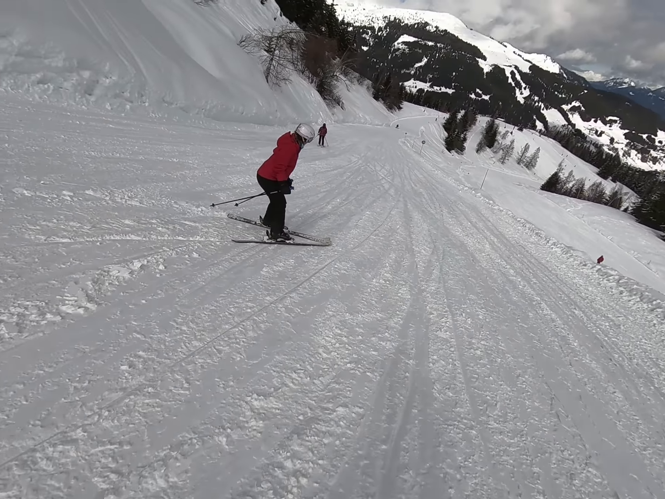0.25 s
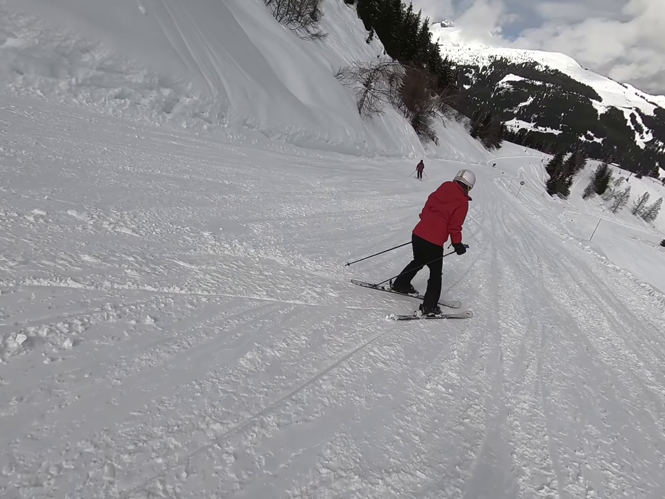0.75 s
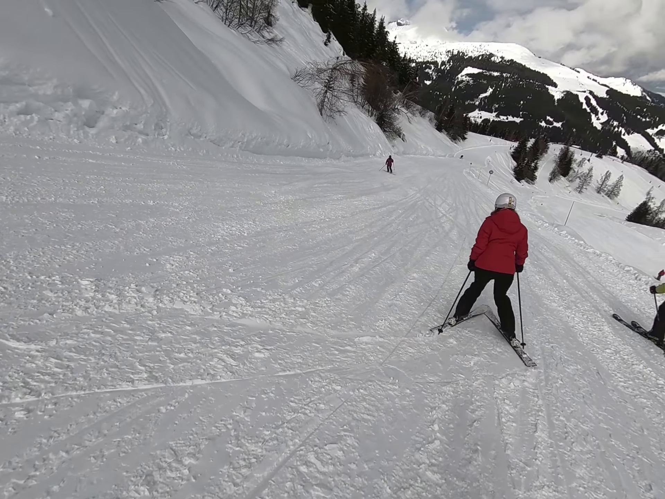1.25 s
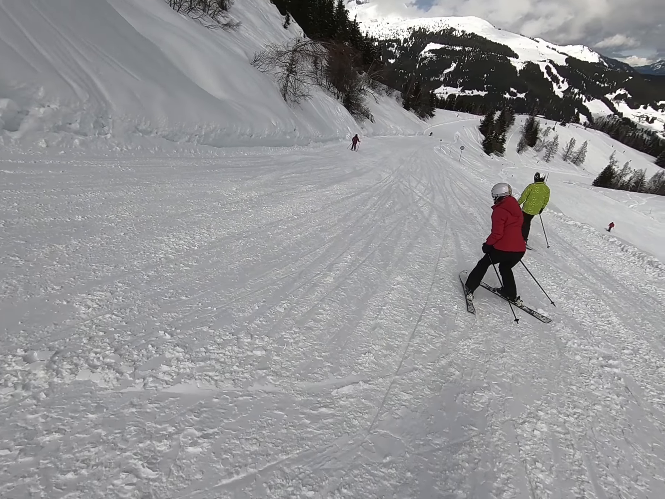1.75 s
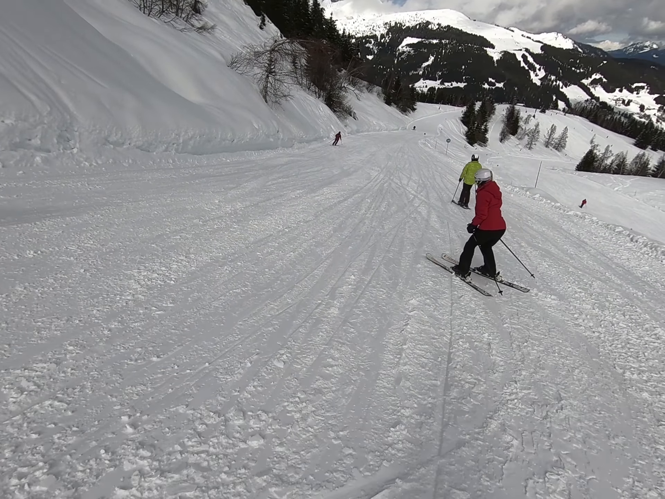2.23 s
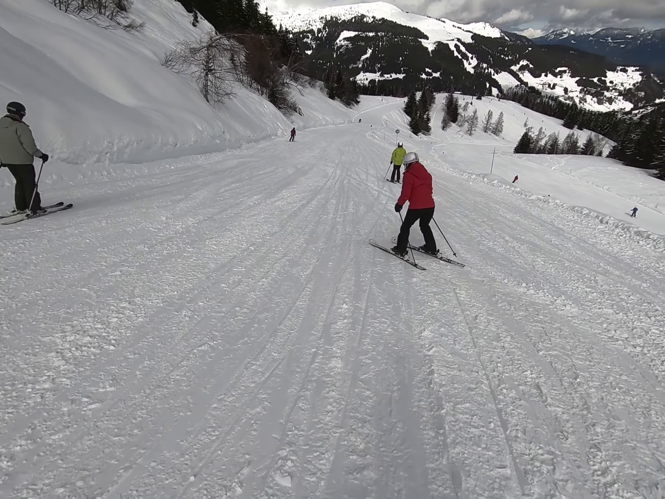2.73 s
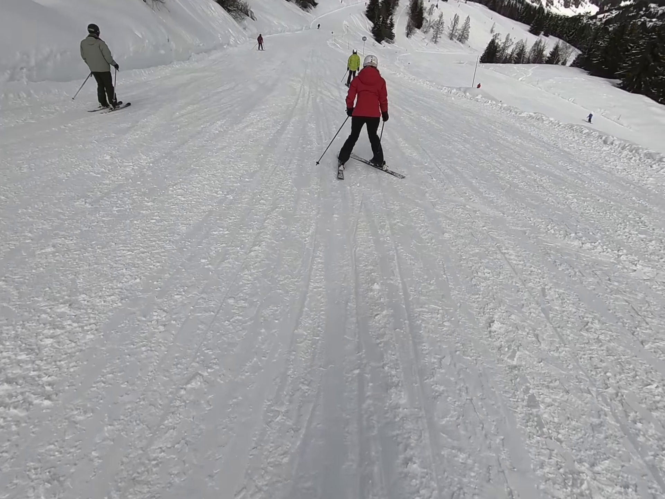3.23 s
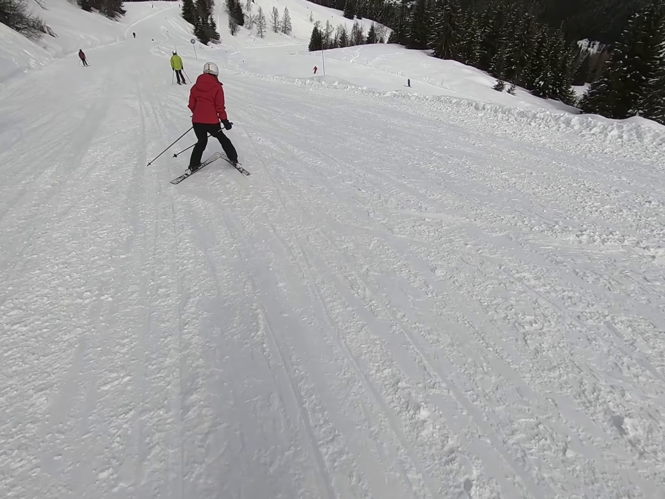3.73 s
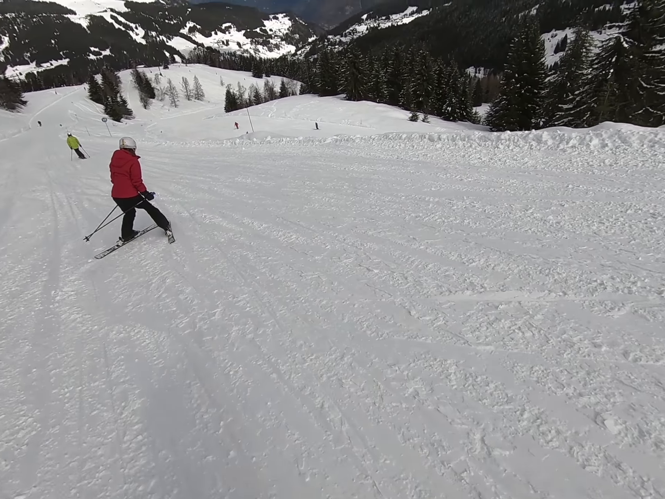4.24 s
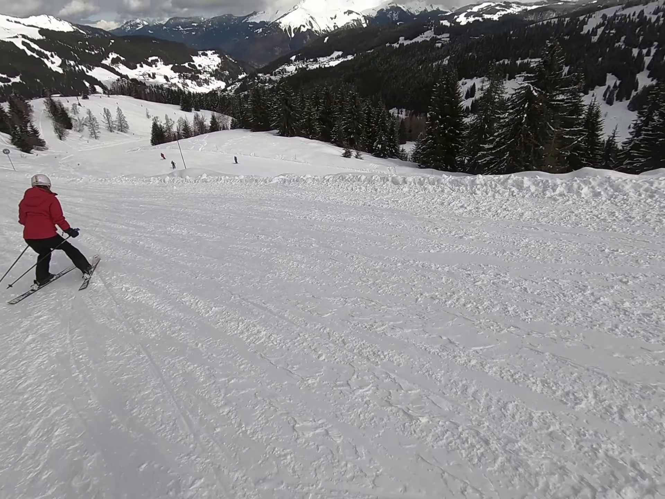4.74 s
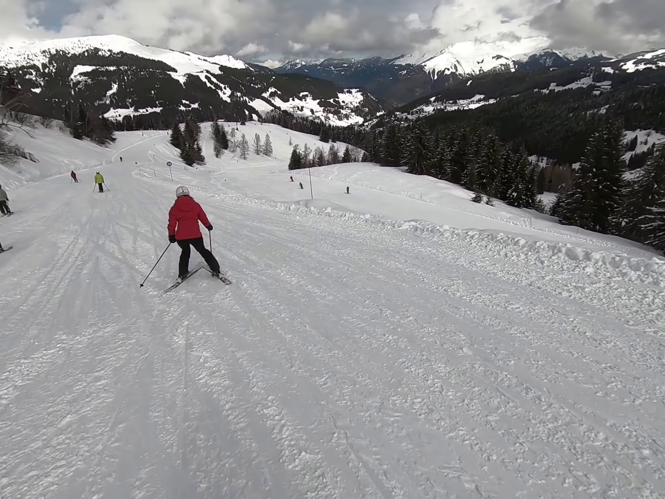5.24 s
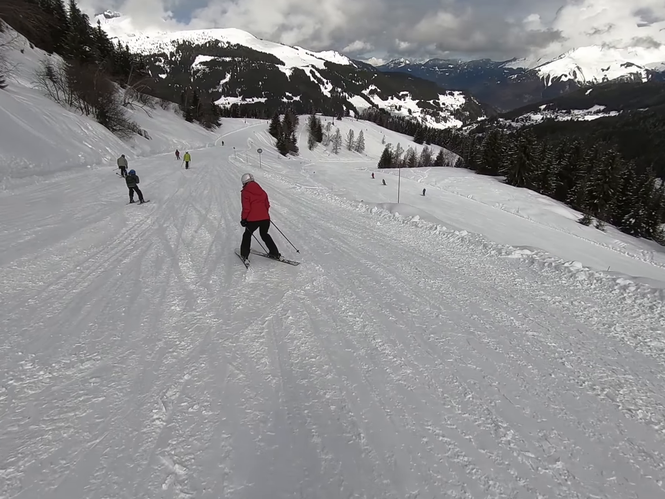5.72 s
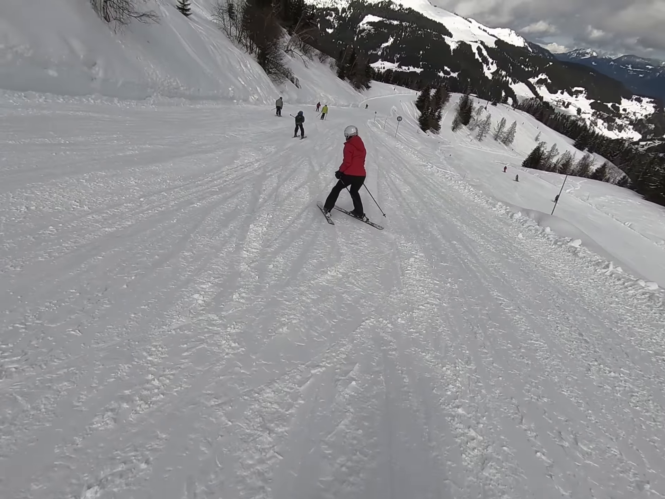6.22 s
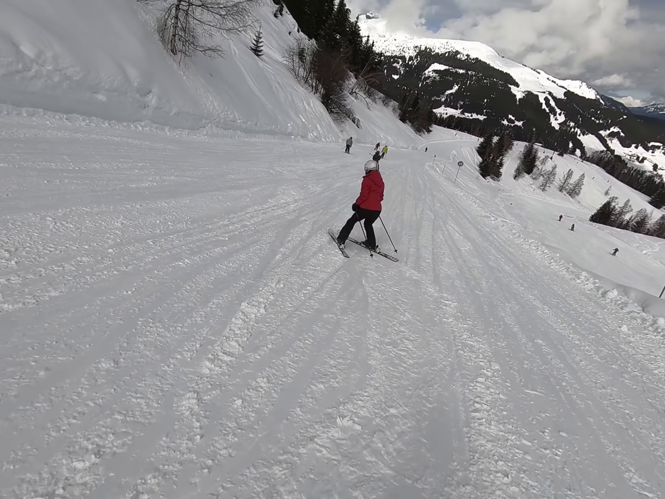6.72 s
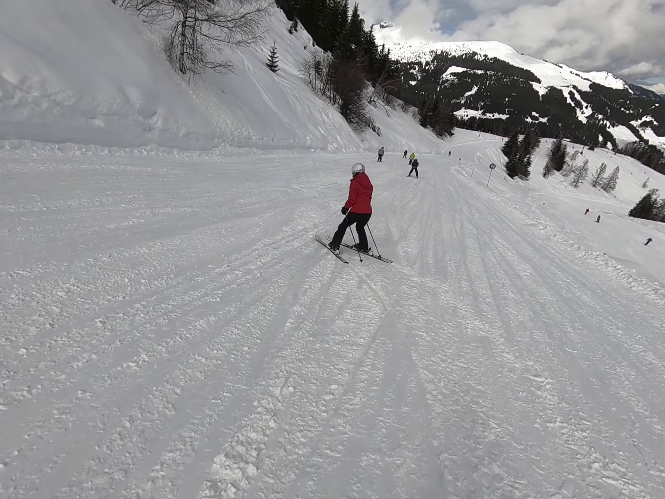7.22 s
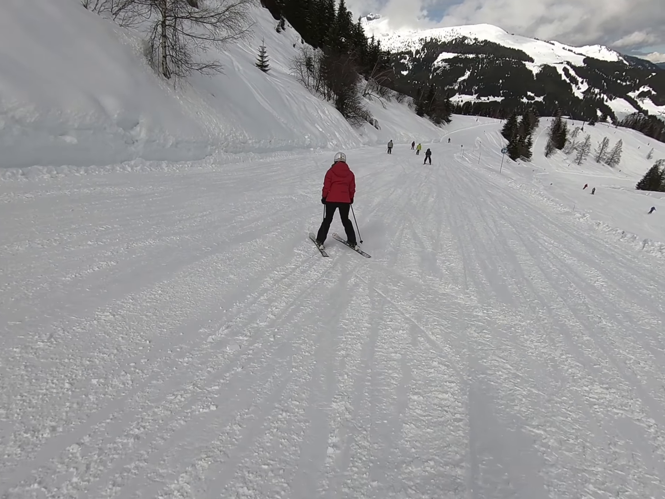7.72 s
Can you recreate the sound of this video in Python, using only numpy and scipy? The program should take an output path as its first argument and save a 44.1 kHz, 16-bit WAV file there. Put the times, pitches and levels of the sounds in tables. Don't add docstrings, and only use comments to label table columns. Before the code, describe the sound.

From 0 to about 1.9 seconds, skis hiss and scrape over chopped snow in a close, centred mono sound with little wind; the crunch is strongest at the start and eases, with a small knock near 0.9 and more thuds and clicks around 1.9 to 2.1. Between 2 and 2.9 the sound opens into wide stereo and wind hits the microphone: a deep, loud booming rumble, heavier on the right, breaking into bursts and brief lulls, with lumpy buffeting on each side. Several lumps thud and click from 2.9 to 3.7 as a spray of snow swells on the left around 3.5. Scraping grows harsher near 4.6, with hard grains ringing on the skis, thins about 5.4, then bites hard again around 6.4. Strong gusts return near 5.6, with short low flutters at 5.8 and 5.9. Icy rattle, hiss and rumble continue until the abrupt end at 8.

```python
import sys
import numpy as np
from scipy import signal
from scipy.io import wavfile
from scipy.ndimage import uniform_filter1d

SR = 44100
rng = np.random.default_rng(int(sys.argv[2]) if len(sys.argv) > 2 else 0)


def linear_from_db(decibels):
    return 10 ** (np.asarray(decibels, float) / 20)


def wrap_up_sound(samples):
    columns = np.atleast_2d(samples).T
    tamed = np.clip(columns, -1, 1)
    steps = np.round(tamed * 32767).astype(np.int16)
    wavfile.write(sys.argv[1], SR, steps)


N = 351477

# [t/s, share/0-1]
PORT_SHARE = [
    (0, 0),
    (1.87, 0),
    (2.3, 0.69),
    (2.9, 1),
    (8, 1),
]
# [t/s, edge load level/dB, thrown snow level/dB, left-right of edges/dB]
SKI_WORK = [(0, -47.5, -50.5, 0), (0.8, -49.5, -55, -2), (1.5, -50.5, -55.5, 4), (2.11, -54, -59.5, -3),
            (2.7, -51, -59, 3), (3.2, -50.5, -55, 2.5), (3.5, -50, -56, -1), (3.7, -51, -59.5, -8),
            (4.05, -48.5, -57, -8.5), (4.6, -47, -53.5, -8), (4.9, -50.5, -59, -9.5),
            (5.12, -51, -59.5, -9.5), (5.42, -56, -63.5, -4.5), (5.85, -50, -58.5, -11),
            (6.35, -46.5, -54.5, -7), (6.95, -50.5, -58, -6), (7.3, -49.5, -55, -10),
            (7.97, -50.5, -60.5, -6)]
# [lowest f/Hz, highest f/Hz]
SKI_BANDS = [(450, 1000), (1100, 3400), (4300, 6300), (6500, 9500)]
# [f/Hz, level/dB per Hz]
SKI_MONO_COLOUR = [(180, -63), (300, -11), (383, -23), (419, -8), (481, -7.5), (998, -9.5), (1730, -8.5),
                   (2690, -26.5), (3530, -23.5), (4300, -14.5), (5750, -5), (7670, -15), (9070, -18),
                   (11400, -34.5), (14800, -76), (22000, -120)]
SKI_PORT_COLOUR = [(210, -18), (350, -2.5), (497, -2.5), (542, -7), (583, -5), (758, -5), (1300, -4),
                   (1570, -7.5), (1790, -7), (1950, -8), (2580, -9), (4050, -17), (7580, -9),
                   (11400, -30.5), (14800, -74), (22000, -120)]
# [f/Hz, likeness/0-1]
PORT_LIKENESS = [(300, 0.96), (700, 0.37), (1200, 0.43), (2000, 0.59), (3300, 0.22), (4200, 0.07),
                 (5500, 0.12), (9000, 0.14), (12000, 0.19)]
# [f/Hz, phase/radians]
LEFT_LEAD = [(0, -1.5), (860, 1.29), (2500, 0.46), (4220, 1.7), (5250, -2), (6890, -2.5), (9300, -6.5),
             (11500, -5), (15200, -30)]
# [t/s, extra likeness/0-1]
NEAR_SPRAY = [
    (0, 0),
    (2.3, 0),
    (3, 0.45),
    (3.55, 0),
    (3.75, 0),
    (8, 0),
]
# [t/s, half length/s, level/dB, centre f/Hz]
SKIDS = [(1.694, 0.25, 8, 7240), (2.26, 0.0078, 5, 1500), (3.259, 0.011, 5.5, 2980),
         (4.335, 0.0072, 2, 1800), (4.525, 0.045, 5.5, 1100), (4.668, 0.014, 6.5, 1800),
         (4.82, 0.0092, 4, 2200), (5.957, 0.018, 3, 2200), (6.798, 0.0063, 7, 2200),
         (7.88, 0.013, 4.5, 1300), (0.305, 0.03, 4.5, 1300), (2.306, 0.11, 3.5, 497),
         (3.09, 0.046, 3.5, 696), (3.478, 0.058, -8, 800), (5.41, 0.13, -9.5, 600), (6.11, 0.059, 3, 890),
         (5.618, 0.037, 4.5, 3000), (5.98, 0.052, 3, 8000), (7.196, 0.09, 3.5, 1410),
         (7.494, 0.044, 2.5, 1200), (7.76, 0.09, -4.5, 700), (3.978, 0.013, 1, 1500), (2.241, .008, 3, 700),
         (2.4, .02, 5, 700), (3.287, .008, 5, 900), (3.467, 0.012, 2.5, 6000), (3.548, 0.018, 4, 3500),
         (3.7, .025, 3, 1000), (4.45, 0.011, 1, 3000), (4.493, .012, -2, 2970), (4.569, 0.0092, 5, 1500),
         (4.62, 0.021, 0, 1500), (4.69, 0.039, 5.5, 598), (5.425, 0.12, 5.5, 3500), (5.6, 0.07, -0.5, 8000),
         (5.552, .11, -1, 15000), (2.35, 0.28, -1.5, 3780), (7.78, 0.019, -2, 2500),
         (3.437, 0.0092, -3, 1300), (1.0, .11, 3, 400), (6.28, .11, 3, 2800), (5.07, .008, 4, 1300),
         (4.78, .04, 2, 5500), (5.555, .012, 3, 1500), (5.7, 0.018, 0, 1400), (6.203, 0.0099, -1, 4000),
         (6.3, 0.017, 0, 4000), (6.385, 0.068, 0.5, 1400), (6.507, 0.01, 1.5, 3000),
         (7.094, 0.015, 4, 7000), (7.192, 0.018, 1.5, 5000), (7.415, .015, 3.5, 1310),
         (7.79, 0.0052, -3, 1900), (1.805, 0.14, 4, 3020)]
# [f/Hz, level/dB per Hz]
DUST_MONO_COLOUR = [(6590, -41), (11200, -14), (11900, -9), (12300, -2), (14800, -11), (15500, -8)]
# [f/Hz, width/Hz, level/dB]
SKI_RINGS = [
    (950, 90, -7),
    (1310, 60, -1),
    (1780, 60, 1),
]
# [t/s, half length/s, level/dB]
ICY_STRETCHES = [
    (4.2, .15, -6),
    (4.6, .15, -0.5),
    (5.05, .25, 9),
    (6.3, 0.39, -4),
    (7.5, 0.71, 3.5),
]
# [f/Hz, level/dB per Hz]
BUFFET_COLOUR = [(41, -30), (70, 0), (86, -2.5), (129, -10.5), (279, -20.5), (317, -23.5), (347, -26),
                 (600, -41), (780, -29), (1320, -120)]
# [t/s, level/dB, left-right/dB, reach/dB per octave]
EDDIES = [(0, -49, -4, -4), (0.18, -51.5, 0, -2), (0.53, -44, 0, 5), (1.86, -51.5, -7, -2.5),
          (1.95, -46, 0, -5.5), (2.53, -37, -8, 0), (2.75, -28, -0.5, -6.5), (3.26, -27, 0, 0),
          (3.6, -32, -5, -1), (3.9, -34, 3, -0.5), (4.35, -43.5, 2, -2.5), (4.71, -35, -2, -1.5),
          (5.2, -40.5, 3, -3.5), (5.6, -27.5, -13, 0.5), (6.45, -28.5, -8.5, -3), (6.88, -35, -2.5, 0),
          (7.08, -26, 0, -7.5), (7.97, -31, 8, -2)]
# [t/s, half length/s, level/dB, left-right shift/dB]
PUFFS = [(1.92, .025, 6, 0), (2.6, .03, 4, 0), (3.13, 0.018, 1, 2), (3.5, .04, 3, 0), (3.97, .04, 3, 0),
         (4.6, .05, 4, 0), (4.95, .04, 4, 0), (6.6, .05, 4, 0), (7.12, .04, 3, 0), (3.27, 0.042, 4, 7.5),
         (3.79, 0.051, -4.5, 9), (4.19, 0.039, 7.5, 4), (5.41, .04, 5.5, 6.5), (5.49, 0.038, -3, 12),
         (5.83, 0.053, -6, 11), (5.9, 0.023, 10, -1), (5.99, 0.1, -9.5, 11), (6.2, 0.046, 0, -6),
         (6.31, 0.044, -3, 9), (7.23, 0.05, 1.5, -10), (7.3, 0.018, -8, 9), (7.42, 0.036, -8.5, 5),
         (7.65, 0.073, -5.5, 2), (7.79, 0.04, 0.5, -2), (7.86, 0.019, 11.5, -2), (7.93, 0.023, 3, -13)]
# [t/s, level/dB, f/Hz, left-right/dB]
THUDS = [(0.94, -34, 620, 0), (1.659, -36, 466, 0), (1.907, -30, 410, 2), (1.996, -30.5, 343, -1),
         (2.083, -37, 360, -1), (2.875, -26, 465, -7), (3.009, -34, 343, -21), (3.226, -34, 337, -21),
         (3.261, -34, 373, 15), (3.283, -33, 560, -22), (3.335, -32, 340, -22), (3.389, -39, 352, 10),
         (3.452, -38, 370, -17), (3.678, -33, 594, -16), (3.687, -35, 590, -18), (3.703, -31, 530, -14),
         (4.085, -39, 387, -6), (4.949, -35, 376, -19), (5.042, -38, 394, -20), (5.22, -34, 342, -13),
         (5.25, -36, 352, -27), (5.63, -41, 320, -13), (5.75, -35, 410, -20), (6.216, -29, 310, -15),
         (6.229, -40, 332, -8), (7.843, -39, 363, -17), (7.879, -35, 388, -20)]
# [t/s, level/dB, f/Hz]
CLICKS = [(0.94, -38, 870), (1.907, -35, 650), (2.135, -34.5, 746), (2.256, -43, 1140), (2.256, -41, 1700),
          (2.875, -37, 1070), (2.876, -46, 1750), (3.226, -43, 861), (3.262, -39, 974), (3.284, -39, 925),
          (3.295, -39, 960), (3.334, -34, 800), (3.452, -35, 1260), (3.452, -45, 805), (3.678, -39, 1000),
          (3.687, -39, 1114), (4.084, -35, 1040), (5.071, -38, 1440), (5.251, -44, 1184), (5.629, -47, 910),
          (5.75, -34.5, 1280), (6.079, -34, 1010), (6.487, -41, 950), (7.789, -37, 1740),
          (7.789, -43, 2170), (7.789, -42, 1410), (7.879, -40, 900)]
# [t/s, boom level/dB, left-right/dB]
WIND = [(0, -57, 0), (1.8, -61, 7), (2.04, -36.5, -14), (2.29, -28, -10), (2.5, -13, -14), (3.0, -16, -18),
        (3.35, -14.5, -5), (3.75, -12.5, -14), (3.92, -22.5, -8), (4.24, -20, -13), (4.66, -26, -7),
        (4.73, -16.5, -6.5), (5.28, -19, -12), (5.62, -13.5, -13.5), (6.26, -19, -12), (6.45, -22.5, -7),
        (6.7, -19, -14.5), (7.97, -19.5, -9)]
# [t/s, half length/s, level/dB, left-right shift/dB]
LULLS = [(0.738, 0.08, -9, 0.0), (1.646, 0.036, 12, -4), (2.405, 0.059, -14.0, 2), (2.524, 0.028, -9, -1.0),
         (2.654, 0.071, -18, 6.0), (2.863, 0.098, -20.0, 14), (2.953, 0.022, -4.5, 12),
         (3.043, 0.052, -7, 6.0), (3.163, 0.032, -7.5, 0.0), (3.302, 0.067, -17.5, -1),
         (3.352, 0.015, 5, -1.0), (3.472, 0.077, -9.5, -4), (3.662, 0.067, -4, 1), (3.851, 0.066, -9.5, -7),
         (3.921, 0.014, 6, -2.0), (3.991, 0.018, -8.5, -6.0), (4.041, 0.017, 7, -3),
         (4.101, 0.039, -10, 5.0), (4.29, 0.015, -6.0, 5), (4.43, 0.09, -6, 3), (4.649, 0.1, -6.5, 1),
         (4.799, 0.015, -9, -2.0), (4.869, 0.024, 6.5, 1), (4.879, 0.11, -10.5, 0.0),
         (5.148, 0.032, -5, -3), (5.318, 0.023, -9.5, 4), (5.458, 0.078, -19.5, -7), (5.587, 0.04, -8, 3),
         (5.747, 0.065, -8, 1), (5.757, 0.022, 6.5, -1.0), (5.797, 0.012, -10, 3.0), (5.917, 0.01, -9, 6.0),
         (6.066, 0.022, -20, 8.0), (6.236, 0.14, -2, 2.0), (6.425, 0.02, -11, 2.0), (6.505, 0.12, -7.5, -3),
         (6.635, 0.015, -0.5, 1), (6.745, 0.062, -4, 3), (6.805, 0.015, -18, 3), (6.864, 0.022, 11, -5),
         (6.884, 0.084, -18.5, 6), (7.044, 0.08, -7.0, 7), (7.244, 0.055, -13, -4),
         (7.383, 0.11, -9.5, 1.0), (7.453, 0.015, -1, 5), (7.583, 0.03, -14, -8), (7.712, 0.022, -17, -1.0),
         (7.932, 0.072, -9, -3.0)]
# [t/s, level/dB]
MIDDLE_TAPS = [(3.3159, -47), (3.717, -41), (3.7798, -42), (3.9744, -43), (4.3934, -44), (4.4643, -39),
               (4.5094, -39), (4.5936, -41), (4.6578, -36), (4.7511, -44), (4.8324, -42), (5.4779, -44),
               (5.687, -49), (5.9439, -38), (6.3784, -41), (6.402, -38), (6.4413, -37), (6.4874, -43),
               (6.7955, -43), (6.881, -42), (7.1272, -41), (7.507, -38), (7.868, -35), (7.8894, -41)]
UPPER_TAPS = [(3.5623, -44), (3.604, -46), (3.7319, -44), (3.9669, -37), (4.3231, -51), (4.371, -37),
              (4.5376, -43), (4.5675, -37), (4.5945, -41), (4.679, -42), (4.7135, -38.5), (4.808, -40),
              (5.004, -47), (5.0654, -42), (5.2609, -45), (6.1963, -41), (6.4378, -45), (7.2294, -37),
              (7.414, -43), (7.4716, -39), (7.5415, -40), (7.5983, -41), (7.6854, -47), (7.8346, -45),
              (7.858, -45), (7.873, -39)]
# [t/s, length/s, level/dB, f/Hz]
FLUTTERS = [
    (5.779, 0.038, -26.5, 277),
    (5.903, 0.042, -30.5, 243),
]


def evened(x):
    return x / np.sqrt(np.mean(x ** 2) + 1e-20)


def read(points, hz):
    f, value = np.transpose(points)
    return np.interp(np.log(hz + 1), np.log(f + 1), value)


def curves(rows, t):
    s, *columns = np.transpose(rows)
    return [np.interp(t, s, column) for column in columns]


def bumps(rows, t):
    s, half, *columns = np.transpose(rows)
    return np.array(columns) @ np.exp(-((t - s[:, None]) / half[:, None]) ** 2)


def panned(pan_db):
    left, right = linear_from_db(pan_db / 2), linear_from_db(-pan_db / 2)
    return np.array([left, right]) / np.sqrt((left ** 2 + right ** 2) / 2)


def stereo(t):
    share = curves(PORT_SHARE, t)[0].clip(0, 1)
    return share, np.minimum(20 * share, 1)


def noise(size):
    hz, t, z = signal.stft(rng.standard_normal((2, N)), SR, nperseg=size, noverlap=size * 3 // 4)
    return hz, t, z[0], z[1]


def sound(z, size):
    return signal.istft(z, SR, nperseg=size, noverlap=size * 3 // 4)[1][..., :N]


def patches(shape, bins, frames):
    field = uniform_filter1d(rng.standard_normal(shape), frames, 1)
    return evened(uniform_filter1d(field, bins, 0))


def band_db(gain, hz, edges):
    inside = (hz >= edges[0]) & (hz < edges[1])
    return 10 * np.log10((gain[inside] ** 2).sum(0) / len(hz) + 1e-20)


def drift(per_s):
    low_pass = signal.butter(2, per_s, fs=SR / 50, output="sos")
    slow = signal.sosfiltfilt(low_pass, rng.standard_normal((2, N // 50 + 2)))
    return np.array([evened(np.interp(np.arange(N) / 50, np.arange(len(v)), v)) for v in slow])


def skids(hz, t):
    s, half, db, centre_hz = np.transpose(SKIDS)[:, :, None]
    octaves = np.where(half < 0.12, 1.3, 0.17)
    over_pitch = db * np.exp(-(np.log2((hz + 1) / centre_hz) / octaves) ** 2)
    return over_pitch.T @ np.exp(-((t - s) / half) ** 4)


def ski_levels(t):
    snow_lag_s = 0.043
    load_db, _, edge_pan_db = curves(SKI_WORK, t)
    snow_db = curves(SKI_WORK, t - snow_lag_s)[1]
    share = stereo(t)[0]
    passing = np.exp(-((t - 3.46) / 0.31) ** 2)
    crunch_db = -52 + 1.55 * (load_db + 50) + 3.5 * (1 - share)
    coarse_db = snow_db - 0.24 * share + 2 * passing
    fine_db = snow_db - 0.04 * share - 5.5 * (1 - share) ** 3
    return crunch_db, load_db, coarse_db, fine_db, edge_pan_db, 7.5 * passing


def skis(flicker_db=0.93, patchy_db=0.84):
    hz, t, a, b = noise(size=512)
    *wanted_db, scrape_pan_db, spray_pan_db = ski_levels(t)
    share, apart = stereo(t)
    mono = linear_from_db(read(SKI_MONO_COLOUR, hz) + 9)[:, None]
    ports = linear_from_db(read(SKI_PORT_COLOUR, hz))[:, None]
    gain = (1 - share) * mono + share * ports
    lift_db = np.array([db - band_db(gain, hz, e) for db, e in zip(wanted_db, SKI_BANDS)])
    # (Hz, band number)
    handover = [(800, 0), (1500, 1), (3000, 1), (5200, 2), (7400, 3)]
    weights = np.array([read([(f, band == k) for f, band in handover], hz) for k in range(4)])
    chatter_db = flicker_db * patches(gain.shape, 110, 5) + patchy_db * patches(gain.shape, 10, 20)
    gain = gain * linear_from_db(weights.T @ lift_db + skids(hz, t) + chatter_db + 1.06 * share)
    edge_part, spray_part = weights[:2].sum(0), weights[2:].sum(0)
    pan_db = np.outer(edge_part, scrape_pan_db) + np.outer(spray_part, spray_pan_db)
    alike = read(PORT_LIKENESS, hz)[:, None] + np.outer(spray_part, curves(NEAR_SPRAY, t)[0])
    same = 1 - share * (1 - alike.clip(0, 1))
    turn = np.exp(1j * share * np.interp(hz, *np.transpose(LEFT_LEAD))[:, None])
    left = same * turn * a + np.sqrt(1 - same ** 2) * b
    return sound(np.array([left, a]) * gain * panned(pan_db * apart), size=512)


def air(flicker_db=2.0):
    dust_lag_s = 0.12
    hz, t, a, b = noise(size=512)
    share = stereo(t)[0]
    mono = linear_from_db(read(DUST_MONO_COLOUR, hz)) * (hz >= 11000)
    ports = linear_from_db(read([(10000, -2.5), (11300, -5), (13500, -6.5), (15700, -15)], hz))
    gain = np.outer(mono, 1 - share) + np.outer(ports, share)
    snow_db = curves(SKI_WORK, t - dust_lag_s)[1]
    under_snow_db = np.maximum(-10 - 3.5 * t, -18)
    gain = gain * linear_from_db(snow_db + under_snow_db + 1.5 - band_db(gain, hz, edges=(11800, 15500)))
    gain = gain * linear_from_db(flicker_db * share * patches(gain.shape, 200, 12) + skids(hz, t))
    return sound(np.array([a, b]) * gain * panned(-2.5 * (1 - share))[:, None], size=512)


def rattle(spread_db=-0.9, taps_per_s=1500):
    t, ring_t = np.arange(N) / SR, np.arange(2000) / SR
    strength = linear_from_db(spread_db * np.minimum(rng.exponential(1, N), 4))
    grains = strength * (rng.random(N) < taps_per_s / SR)
    out = np.zeros(N)
    for hz, width, db in SKI_RINGS:
        ring = linear_from_db(db) * np.exp(-np.pi * width * ring_t) * np.sin(2 * np.pi * hz * ring_t)
        out += signal.oaconvolve(grains * rng.standard_normal(N), ring)[:N]
    share = stereo(t)[0]
    level_db = 3.2 * (curves(SKI_WORK, t)[0] + 50) - 59.5 + bumps(ICY_STRETCHES, t)[0]
    return linear_from_db(level_db) * share.clip(0.15, 1) * evened(out) * panned(-8 * share)


def buffet(lumps_db=2.5, patchy_db=-0.5):
    hz, t, a, b = noise(size=1024)
    level_db, pan_db, reach_db = curves(EDDIES, t)
    puff_db, shift_db = bumps(PUFFS, t)
    level_db, pan_db = level_db + puff_db, pan_db + shift_db
    reach_db = reach_db - 0.54 * puff_db
    share, apart = stereo(t)
    mono_db = read([(70, -10.5), (115, -11), (190, 2.0), (330, -2.5), (600, -12.5)], hz)[:, None]
    colour_db = share * read(BUFFET_COLOUR, hz)[:, None] + (1 - share) * mono_db
    octaves = np.log2((hz[:, None] + 30) / 150).clip(-1, 2)
    gain = linear_from_db(colour_db + reach_db * octaves) * ((hz > 60) & (hz < 700))[:, None]
    gain = gain * linear_from_db(level_db - band_db(gain, hz, edges=(85, 330)))
    lumps = []
    for port in "lr":
        lumps_now_db = lumps_db * patches(gain.shape, 30, 3) + patchy_db * patches(gain.shape, 3, 8)
        lumps.append(linear_from_db(lumps_now_db))
    left = a * lumps[0]
    right = np.sqrt(1 - share) * left + np.sqrt(share) * b * lumps[1]
    z = np.array([left, right]) * gain * panned(pan_db * apart)[:, None]
    z = z / np.sqrt(np.mean(lumps[0] ** 2))
    return sound(z * linear_from_db(2 * share), size=1024)


def knocks(droop=0.42, rise_s=0.0023, click_rise_s=0.0013, late_s=0.00168):
    out, t = np.zeros((2, N)), np.arange(1200) / SR
    thud_shape = t / rise_s * np.exp(1 - t / rise_s)
    click_shape = t / click_rise_s * np.exp(1 - t / click_rise_s)
    for s, db, hz, pan_db in THUDS:
        glide_hz = hz * (1 + droop * (1 - t / 0.0029).clip(-1, 1))
        thud = linear_from_db(db) * thud_shape * np.sin(2 * np.pi * np.cumsum(glide_hz) / SR)
        out[:, round((s + late_s) * SR):][:, :len(t)] += np.outer(panned(pan_db * stereo(s)[1]), thud)
    for s, db, hz in CLICKS:
        click = linear_from_db(db) * click_shape * np.sin(2 * np.pi * hz * t)
        out[:, round((s + late_s) * SR):][:, :len(t)] += np.outer(panned(-9.5 * stereo(s)[1]), click)
    return out


def rumble(centre_hz=28, width_hz=26):
    turning = np.exp(2j * np.pi * centre_hz * np.arange(N) / SR)
    return (drift(width_hz) + 1j * drift(width_hz)) * turning / np.sqrt(2)


def boom(boom_hz=42.5, wander_hz=5.5, wander_per_s=9, wobble_db=2.5, mono_wobble_db=6.0):
    t = np.arange(N) / SR
    lull_db = bumps(LULLS, t)
    level_db, pan_db = curves(WIND, t) + lull_db
    apart = stereo(t)[1]
    turns = np.cumsum(boom_hz + wander_hz * (2 - apart) * drift(wander_per_s), axis=1) / SR
    wobble = linear_from_db((mono_wobble_db + (wobble_db - mono_wobble_db) * apart) * drift(33))
    ring = wobble * np.exp(2j * np.pi * turns)
    loose = linear_from_db(-10 + 5.6 * (1 - apart) - 0.4 * lull_db[0]) * rumble()
    right, own = ring + loose
    same = 1 - (1 - 0.89) * apart
    lag = np.exp(-0.87j * apart)
    left = same * right * lag + np.sqrt(1 - same ** 2) * own
    return linear_from_db(level_db + 0.5) * panned(pan_db * apart) * np.sqrt(2) * np.real([left, right])


def taps(rise_s=0.0018):
    out, t = np.zeros(N), np.arange(1500) / SR
    for rows, (hz, width, _) in zip((MIDDLE_TAPS, UPPER_TAPS), SKI_RINGS[1:]):
        for (s, db), (off, phase) in zip(rows, rng.standard_normal((len(rows), 2))):
            shape = np.minimum(t / rise_s, 1) * np.exp(-np.pi * 0.7 * width * t)
            ring = shape * np.sin(2 * np.pi * hz * (1 + 0.011 * off) * t + phase)
            out[round(s * SR):][:len(t)] += linear_from_db(db + 0.5) * ring
    return out[None] * panned(-8)[:, None]


def flutters(wobbles_hz=55):
    out = np.zeros(N)
    for s, length, db, hz in FLUTTERS:
        t = np.arange(0, length, 1 / SR)
        turns = np.cumsum(hz * (1 + 0.33 * np.cos(2 * np.pi * wobbles_hz * t))) / SR
        whistle = signal.windows.tukey(len(t), 0.4) * np.sin(2 * np.pi * turns)
        out[round(s * SR):][:len(t)] += linear_from_db(db) * whistle
    return out * [[0.25], [1]]


def scene():
    on_snow = skis() + air() + rattle() + knocks() + taps()
    wind = buffet() + boom() + flutters()
    return on_snow + wind


def top_cut(x):
    return signal.sosfilt(signal.butter(12, 15640, fs=SR, output="sos"), x)


def record(dry):
    ceiling = 0.74
    ending = np.minimum(np.arange(N)[::-1] / 300, 1)
    mix = ending * ceiling * np.tanh(dry / ceiling)
    return top_cut(mix)


dry = scene()
out = record(dry)
wrap_up_sound(out)
```